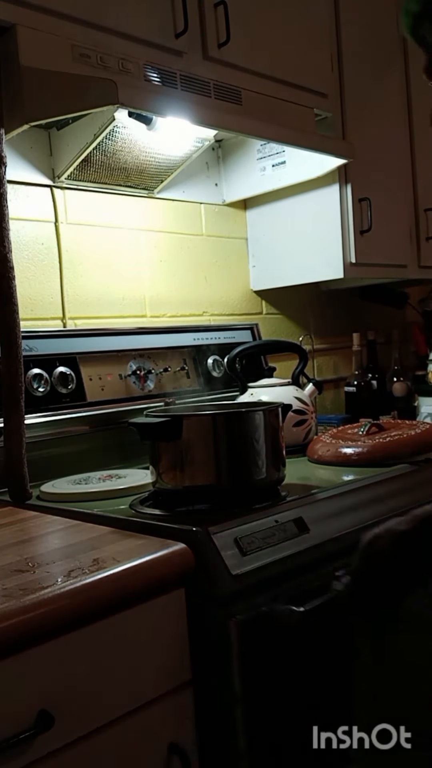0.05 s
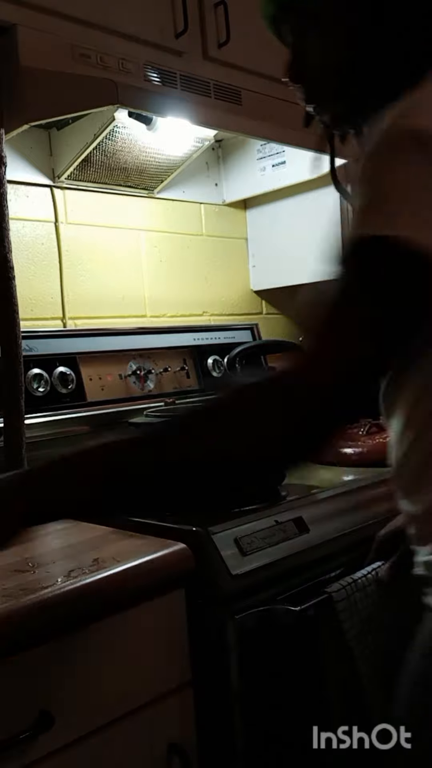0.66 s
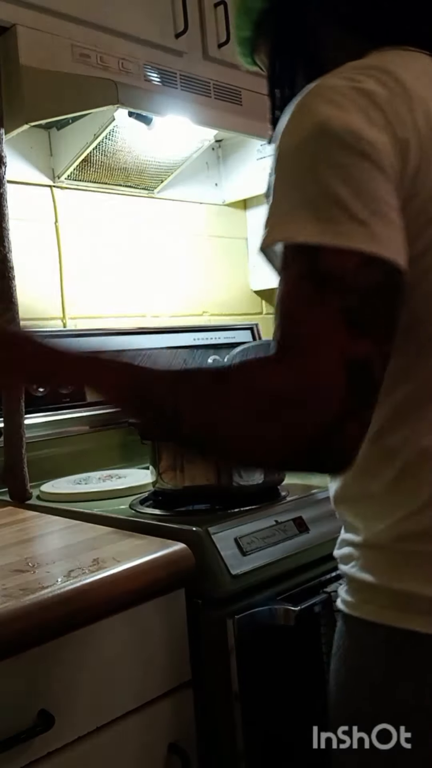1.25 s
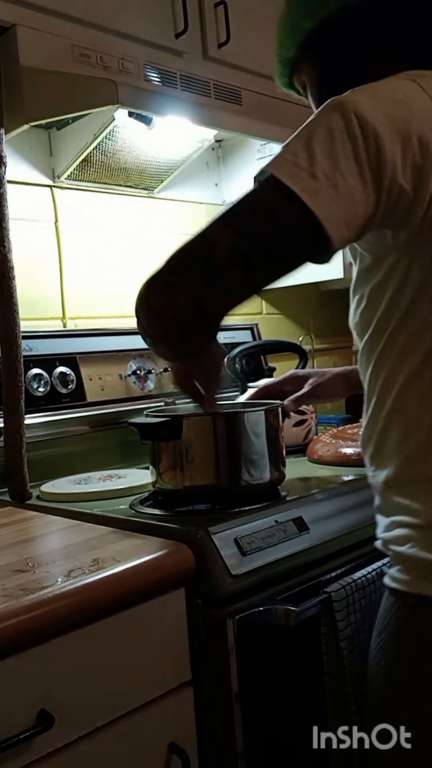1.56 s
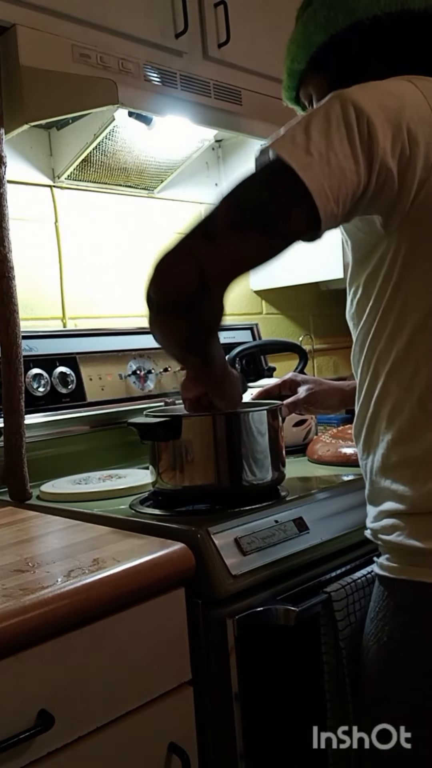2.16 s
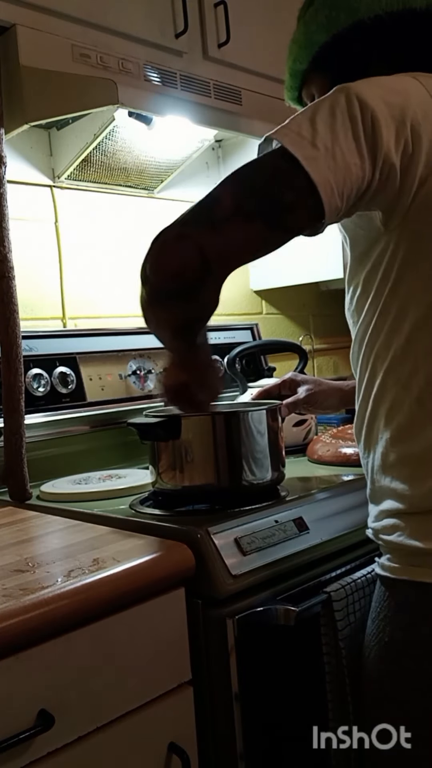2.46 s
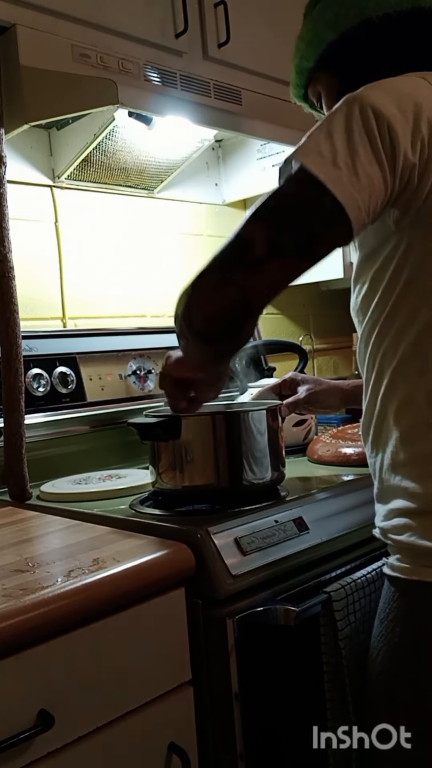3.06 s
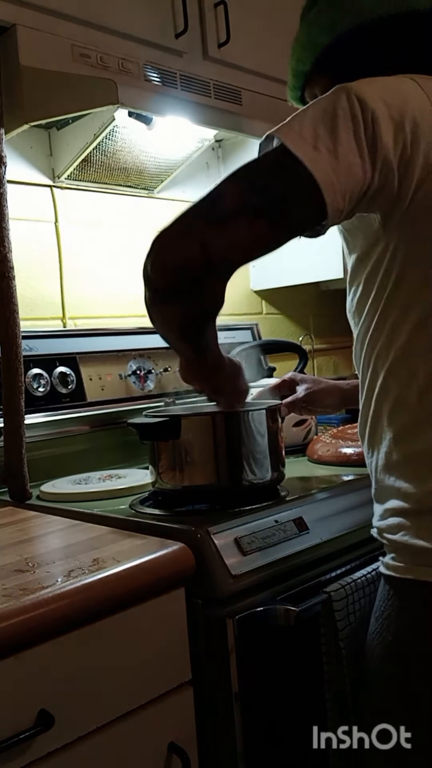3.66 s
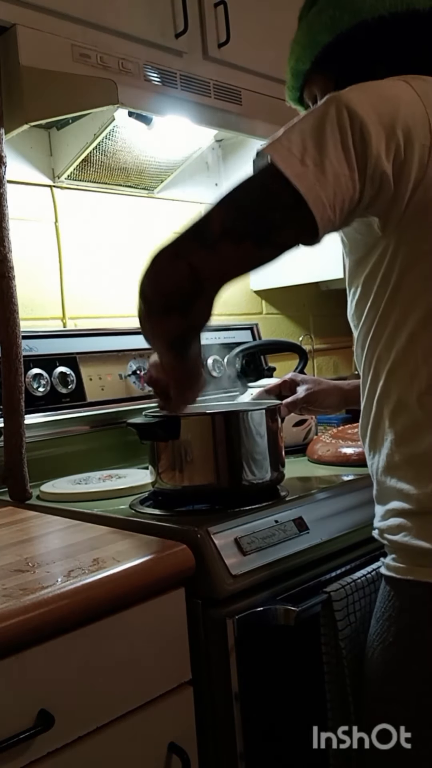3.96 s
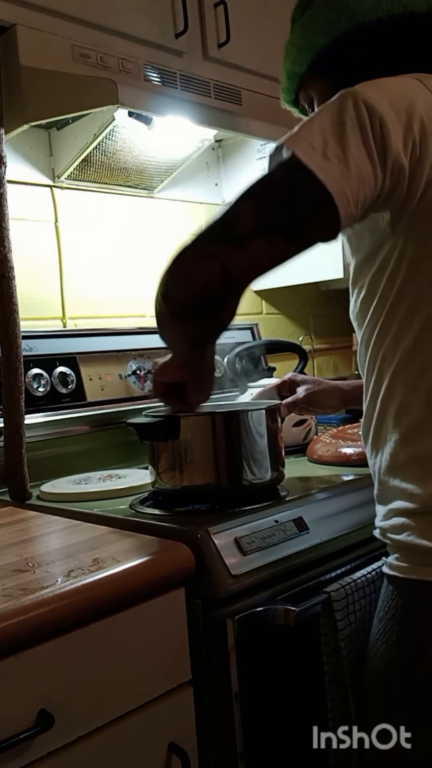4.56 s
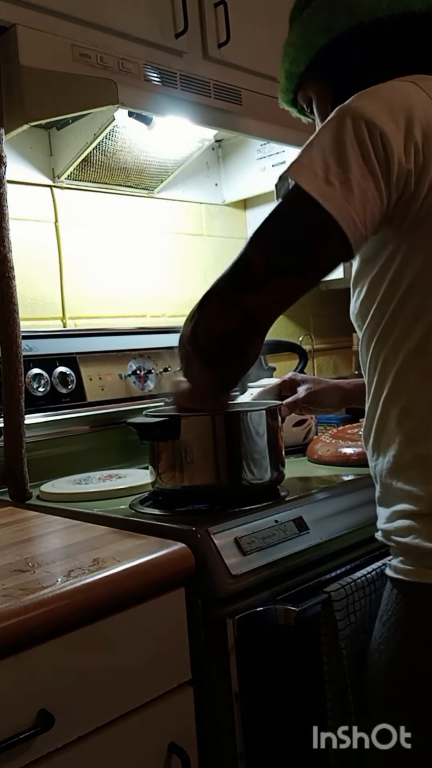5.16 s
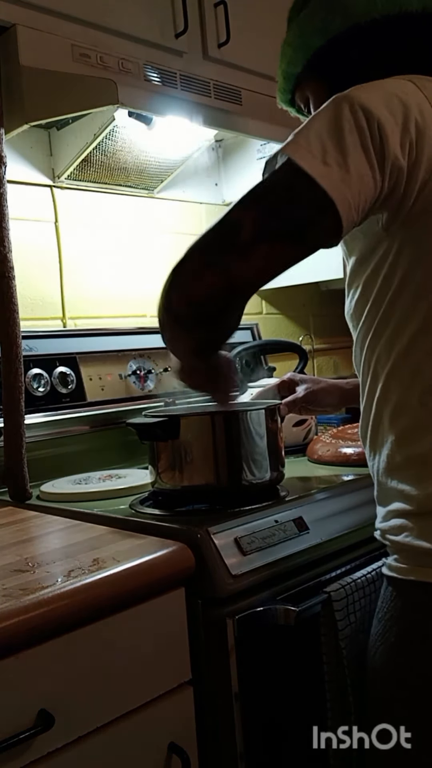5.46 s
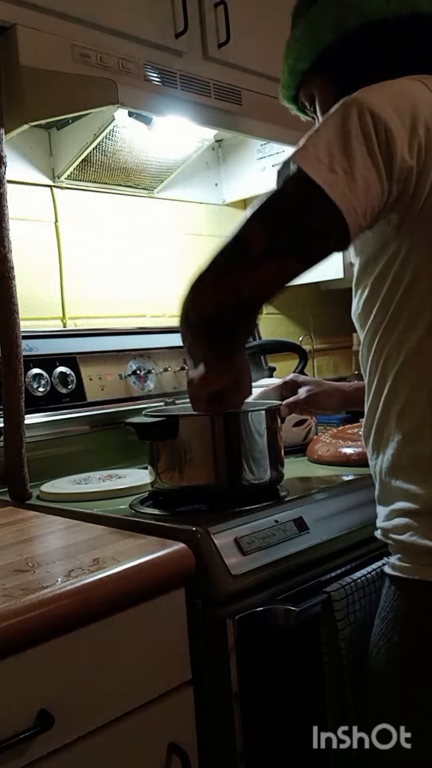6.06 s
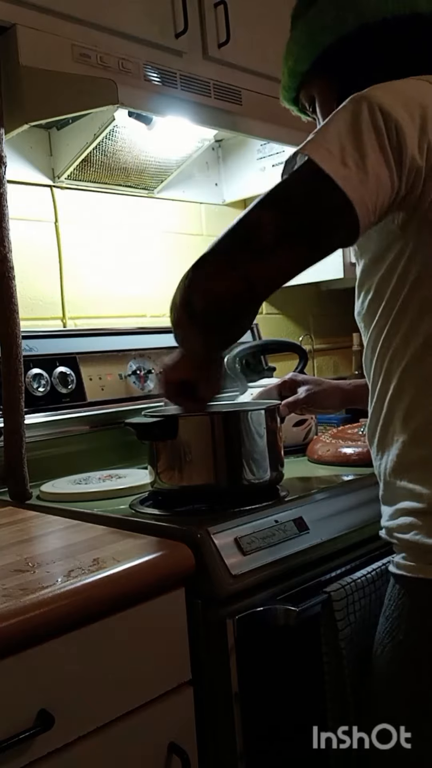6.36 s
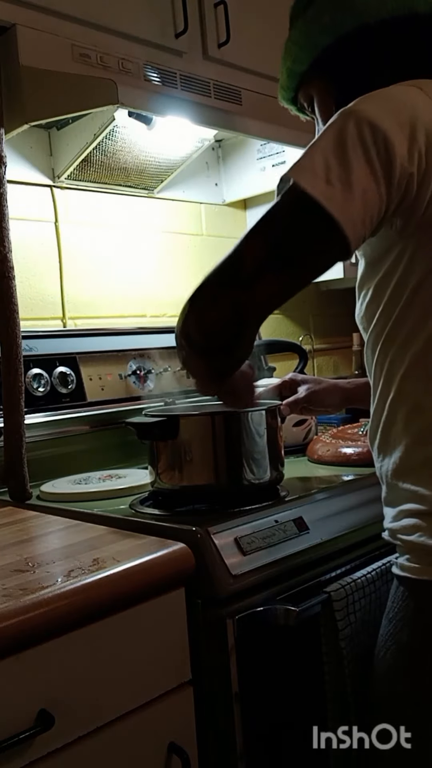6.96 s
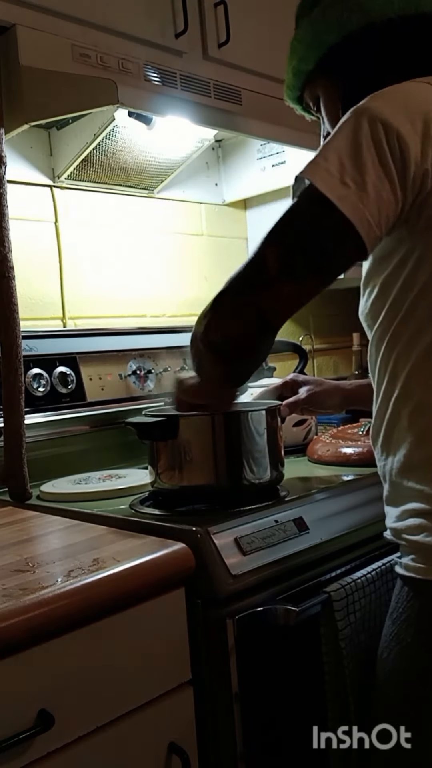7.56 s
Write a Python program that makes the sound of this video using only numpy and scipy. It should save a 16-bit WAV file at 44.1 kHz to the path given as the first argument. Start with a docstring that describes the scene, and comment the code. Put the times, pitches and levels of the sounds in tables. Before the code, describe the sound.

An oven door knocks shut in a small kitchen while a steel pot simmers faintly. A spoon is picked up with a scuff and a clack, clinks into the pot and begins stirring. A bright sizzling hiss swells, with repeated scrapes, small metallic squeaks, soft slops of wet food and dull bumps from the stove. Near the end the spoon clinks again and the hiss eases. A nearby phone microphone picks up a low room rumble.

```python
"""An oven door knocks shut over the faint hiss of a steel pot simmering in a small kitchen. A spoon is
picked up with a scuff and a clack, clinks into the pot and stirs: wet food boils on hot steel, and the
hiss of countless bursting bubbles swells, then slowly eases. Stick-slip friction makes the spoon rasp
and squeak, slopping food excites the air resonances of the pot, and the stove's sheet metal booms dully.
The room reverberates briefly; a phone with two unlike microphones listens."""
import sys
import numpy as np
from scipy import signal
from scipy.fft import rfft, irfft, next_fast_len
from scipy.io import wavfile
from scipy.ndimage import uniform_filter1d

SR = 44100
rng = np.random.default_rng(int(sys.argv[2]) if len(sys.argv) > 2 else 0)


def dump_mix(stems):
    """Bounce the given channels to the path in sys.argv[1] as a 16-bit WAV at rate SR."""
    frames = np.atleast_2d(stems).T  # one column per channel
    limited = np.clip(frames, -1, 1)  # hard clip at full scale
    pcm = np.round(limited * 32767).astype(np.int16)
    wavfile.write(sys.argv[1], SR, pcm)


N = 344421
TIME = np.arange(N) / SR

# Levels in the tables are relative; each source sets its overall gain.
# spectrum of the kitchen's rumble: (f/Hz, level/dB)
RUMBLE_SPECTRUM = [(20, -44), (45, -19), (75, -6.5), (110, -3.5), (160, -1), (270, -8.5), (380, -0.5),
                   (550, -12), (900, -15), (3000, -12.5)]
# dull blows through the stove: (t/s, level/dB, centre f/Hz, T60/s)
STOVE_BUMPS = [(.003, -34, 75, 0.45), (.01, -34.5, 146.5, 0.26), (0.719, -34.5, 84, 0.32),
               (0.729, -36, 160, 0.22), (.895, -49.5, 105, 0.73), (2.083, -44, 143, 0.19),
               (4.524, -44, 146.4, 0.43), (4.585, -42.5, 145, 0.27), (5.062, -46.5, 149, 0.31),
               (5.499, -35, 146, 0.23), (5.515, -40, 370, 0.32), (6.051, -44, 153, 0.27),
               (6.42, -41.5, 149, 0.18), (6.902, -40, 145, 0.27), (6.904, -47, 383, 0.18),
               (7.082, -37.5, 145.5, 0.24)]
# door, then spoon on counter, a row per band: (t/s, level/dB, rise/s, T60/s, low f/Hz, high f/Hz)
KNOCK_BANDS = [(0, -21, 0.0007, 0.08, 450, 1000), (0, -30.5, 0.0017, 0.078, 4500, 6000),
               (0, -22, 0.0007, 0.084, 1500, 2840), (0.691, -30, 0.008, 0.12, 1490, 3620),
               (.709, -20, 0.0027, 0.29, 1000, 3700), (.707, -23.5, 0.007, 0.12, 4200, 13700),
               (.857, -28, .004, 0.13, 1210, 2880), (.876, -17, 0.002, 0.17, 1010, 3100),
               (.877, -18, 0.0007, 0.03, 860, 1270), (.876, -37, .002, .14, 3500, 6000)]
# modes of the air in the pot: (f/Hz, bandwidth/Hz, level/dB)
CAVITY_MODES = [(540, 97, 2), (960, 82, -17), (1210, 158, -5.5)]
# gulps of food, plus a hollow ring after the first clink (1.6 s) and a light knock in the pot (4.798 s):
# (t/s, duration/s, level/dB, lowest mode f/Hz)
CAVITY_SOUNDS = [(1.6, 0.16, -45, 880), (1.795, 0.063, -32.5, 522), (1.868, 0.09, -42.5, 560),
                 (2.021, 0.12, -36.5, 540), (2.11, 0.085, -41, 540), (2.298, 0.086, -40, 511),
                 (2.728, 0.058, -36.5, 550), (2.86, 0.079, -41, 550), (3.136, 0.092, -45, 540),
                 (4.425, 0.053, -39.5, 556), (4.56, 0.05, -48, 540), (4.813, 0.1, -39.5, 580),
                 (4.798, 0.092, -46, 1000), (5.16, 0.049, -42.5, 563), (5.48, 0.057, -39, 537),
                 (5.612, 0.074, -38.5, 540), (6.195, 0.067, -48, 580), (6.873, 0.045, -37.5, 520),
                 (7.657, 0.067, -47.5, 550)]
# modes of the spoon and of the pot wall: (f/Hz, level/dB, T60/s)
SPOON_MODES = [(491, -15.5, 0.18), (550, -17.5, 0.31), (880, -12, 0.084), (4900, -27, 0.039),
               (5190, 4, 0.025), (5140, -6, 0.033), (5240, 6, 0.027), (5850, -17, 0.059), (6190, -7, 0.077),
               (9950, -8, 0.063), (10240, -12, 0.055)]
WALL_MODES = [(1222, -14, 0.44), (1865, -14, 0.16), (3180, -36, 0.17), (3610, -2.5, 0.12), (4360, -5, 0.12),
              (6040, -5, 0.07), (6130, -3, 0.046), (6090, 7, 0.064), (6530, 5, 0.16), (7290, 4, 0.073),
              (8040, 10, 0.073)]
# spoon striking the pot: (t/s, spoon level/dB, wall level/dB)
SPOON_BLOWS = [(1.537, -17.5, -77), (1.544, -48, -63), (1.577, -22.5, -62), (6.795, -60, -23),
               (6.815, -53, -26.5), (7.188, -56, -42)]
# drags that catch one note of the steel: (t/s, duration/s, f/Hz, level/dB)
SQUEAK_NOTES = [(.7, 0.096, 6430, -32), (0.692, 0.085, 5480, -39), (0.703, 0.098, 9920, -33),
                (2.35, 0.12, 1827, -40), (2.39, 0.071, 1190, -42), (2.665, 0.057, 1233, -39),
                (3.828, 0.07, 4220, -32), (4.365, 0.081, 3110, -31.5), (4.69, 0.17, 1878, -40),
                (4.699, 0.051, 4650, -25), (4.728, 0.072, 3593, -33), (5.168, 0.062, 2312, -35.5),
                (5.695, 0.048, 3640, -32.5), (5.727, 0.12, 5056, -27.5), (6.168, 0.18, 1914, -34),
                (6.438, 0.16, 1884, -41.5), (7.08, 0.21, 6030, -31), (7.117, 0.073, 5000, -30),
                (7.127, 0.12, 6580, -30), (7.13, 0.055, 1198, -45), (7.181, 0.072, 3644, -31),
                (7.57, 0.09, 5650, -39)]
# spoon strokes: (t/s, duration/s, drag level/dB, wetted steel's hiss level/dB, bare steel contact 0-1)
SPOON_STROKES = [(1.608, 0.15, -33.5, -44, 0.54), (1.81, 0.28, -31, -34, 0.5),
                 (2.084, 0.37, -31.5, -47, 0.84), (2.487, 0.29, -38, -39, 1), (2.848, 0.4, -38.5, -34, .85),
                 (3.283, 0.41, -53, -47, 0.3), (3.79, 0.19, -43, -31, 0.95), (4.315, 0.37, -40.5, -27, 1),
                 (4.7, 0.063, -31, -34, 0.9), (4.81, 0.15, -38, -30.5, 0.84), (4.987, 0.29, -36, -31, 0.95),
                 (5.29, 0.29, -36, -38.5, 0.6), (5.603, 0.18, -36, -31, .58), (5.8, .16, -42.5, -47, 0.2),
                 (6.128, .24, -36.5, -32.5, 1), (6.484, 0.21, -40, -39, 1), (7.05, 0.16, -38, -27, 0.83),
                 (7.563, 0.12, -45.5, -38.5, 0.5)]
# spectrum of the spoon's rasp: (f/Hz, level/dB)
RASP_SPECTRUM = [(600, -36), (950, -24), (1050, -17), (1140, -11), (1290, -8), (1400, -6.5), (1700, -12.5),
                 (1860, 6.5), (2020, -5.5), (2400, -1.5), (3300, 0), (4300, 3.5), (7000, -10)]
# boiling that simmers, surges as the food is turned, then eases: (t/s, hiss level/dB, spray level/dB)
BOILING_LEVELS = [(0.3, -45, -55), (1.5, -47, -59.5), (1.71, -38, -57), (1.79, -27, -47),
                  (1.92, -27.5, -37), (2.17, -26, -40), (2.3, -28.5, -43), (2.45, -28.5, -39.5),
                  (3.6, -28.5, -39.5), (4.2, -32.5, -40.5), (5.55, -30, -46), (5.88, -30.5, -41.5),
                  (6.7, -32.5, -48.5), (7.0, -35, -55), (7.42, -43.5, -55), (7.8, -40, -59)]
# spectra of bubbles, of the finest droplets and of food meeting dry steel: (f/Hz, level/dB)
HISS_SPECTRUM = [(300, -29), (800, -39), (1500, -12.5), (2100, -11), (3500, -12), (4700, 5), (7000, 3.5),
                 (8500, -1.5), (11000, -8), (16000, -21)]
SPRAY_SPECTRUM = [(5000, -18.5), (7500, 10), (9000, -1), (11000, 4), (16000, 0)]
FLASH_SPECTRUM = [(7000, -35), (9000, 9), (12000, -10), (14500, 14), (16000, 4)]
# responses of the two microphone ports: (f/Hz, level/dB)
LEFT_RESPONSE = [(100, -1.5), (3500, 3.5), (4400, 0.5), (5200, 5), (5900, 9), (6500, 7), (7000, 2),
                 (7500, -7), (8000, -21), (9000, -31), (10000, -43), (13000, -36), (15700, -16)]
RIGHT_RESPONSE = [(100, -9), (1200, -7.5), (2000, -11), (4000, -10.5), (5700, -15.5), (7000, -18),
                  (8300, -20), (9200, -9.5), (10300, -2.5), (11100, -1.5), (12200, -6.5), (13400, -12),
                  (15500, -5.5)]

STROKE_ATTACK_S, STROKE_RELEASE_S, STROKE_SAG_DB_PER_S = 0.054, 0.16, 6.5
STIR_FROM_S, STIR_UNTIL_S, GRAZE_DB, GRAZE_BARE = 1.64, 7.3, -44, 0.8  # light contact between strokes
ROOM_T60_S, ECHO_TO_DIRECT_DB = 0.27, 3
LEFT_LAG_SAMPLES, CUTOFF_HZ = 42, 15950


def undb(db):
    """Amplitude ratio of a level in decibels."""
    return 10 ** (np.asarray(db) / 20)


def unit(x):
    """Normalisation to an rms of 1."""
    return x / np.sqrt(np.mean(x ** 2))


def shape(x, gain):
    """Linear filtering: the spectrum is multiplied by a function of frequency."""
    size = next_fast_len(len(x) + 8192)
    hz = np.maximum(np.arange(size // 2 + 1) * SR / size, 1)
    return irfft(rfft(x, size) * gain(hz), size)[:len(x)]


def colour(x, spectrum):
    """Spectral shaping by (f/Hz, level/dB) points, joined on a logarithmic frequency axis."""
    hz, db = np.transpose(spectrum)
    return shape(x, lambda f: undb(np.interp(np.log(f), np.log(hz), db)))


def resonate(x, hz, width_hz):
    """Resonance: two equal resonators in cascade, each of the given bandwidth."""
    b, a = signal.iirpeak(hz, hz / width_hz, fs=SR)
    return signal.lfilter(b, a, signal.lfilter(b, a, x))


def wander(rate_hz):
    """Slow random modulation: held random levels, smoothed twice."""
    hold = int(SR / rate_hz)
    steps = np.repeat(rng.standard_normal(N // hold + 1), hold)
    return 0.81 * uniform_filter1d(uniform_filter1d(steps, hold), hold)[:N]


def pops(per_s, spread_db):
    """Shot noise: impulses at random moments, most small and a few large."""
    happens = rng.random(N) < per_s / SR
    return happens * rng.choice([-1, 1], N) * undb(spread_db * np.minimum(rng.exponential(size=N), 6))


def fade(t, t60):
    """Exponential damping, by 60 dB in t60 seconds."""
    return np.exp(-np.log(1000) * t / t60)


def add(track, s, sound):
    """Superposition of a sound on the track at s seconds."""
    start = max(int(s * SR), 0)
    track[start:start + len(sound)] += sound[:N - start]


def swell(hz, width_hz, length):
    """Narrow-band noise: a randomly driven resonance that swells and fades."""
    settle = 512  # samples for the resonance to build up
    note = resonate(rng.standard_normal(int(length * SR) + settle), hz, width_hz)[settle:]
    return unit(note) * np.hanning(len(note))


def room(x):
    """Reverberation from tiles and cupboards; long waves reach both ports coherently."""
    t = TIME[:SR // 2]
    shared, *separate = rng.standard_normal((3, len(t)))
    coherence = lambda hz: 1 / (1 + (hz / 750) ** 2)
    common = shape(shared, lambda hz: np.sqrt(coherence(hz)))
    channels = []
    for noise in separate:
        own = shape(noise, lambda hz: np.sqrt(1 - coherence(hz)))
        echoes = (common + own) * fade(t, ROOM_T60_S) * (t > 0.002)
        response = (t == 0) + undb(ECHO_TO_DIRECT_DB) * echoes / np.linalg.norm(echoes)
        channels.append(signal.fftconvolve(x, response / np.linalg.norm(response))[:N])
    return np.array(channels)


def background():
    """Ambient noise: the kitchen's broadband rumble and a faint narrow-band motor hum."""
    rumble = unit(colour(rng.standard_normal(N), RUMBLE_SPECTRUM)) * undb(0.44 * wander(8.3))
    hum = unit(resonate(rng.standard_normal(N), hz=194.6, width_hz=12))
    return undb(-43.5) * rumble + undb(-60) * hum


def bumps():
    """Plate vibration: soft blows excite a cluster of low modes in the stove's sheet metal."""
    out, t = np.zeros(N), TIME[:SR // 2]
    for s, db, hz, t60 in STOVE_BUMPS:
        modes_hz = hz * (np.array([0.8, 1, 1.2]) + 0.052 * rng.standard_normal(3))
        cycles = np.outer(modes_hz, t) + rng.random((3, 1))
        boom = np.array([0.7, 1.3, 0.7]) @ np.sin(2 * np.pi * cycles)
        add(out, s, undb(db) * boom * np.minimum(t / 0.0015, 1) * fade(t, t60))
    return out


def knocks():
    """Modal overlap: the crowded, damped modes of door and counter merge into bands of noise."""
    out, t = np.zeros(N), TIME[:SR // 2]
    for s, db, rise, t60, low_hz, high_hz in KNOCK_BANDS:
        band = lambda hz: 1 / (1 + (low_hz / hz) ** 6) / (1 + (hz / high_hz) ** 8)
        body = unit(shape(rng.standard_normal(len(t)), band))
        attack = np.minimum(t / rise, 1)  # slower for a sliding contact
        add(out, s, undb(db) * body * attack * fade(np.maximum(t - rise, 0), t60))
    return out


def pot_cavity():
    """Cavity resonance: gulps of food, a hollow ring and a light knock, over a soft squelch."""
    hollow_notes, squelch = np.zeros((2, N))
    for s, length, db, lowest_hz in CAVITY_SOUNDS:
        tuning = lowest_hz / CAVITY_MODES[0][0]
        for hz, width_hz, mode_db in CAVITY_MODES:
            add(hollow_notes, s, undb(db + mode_db) * swell(hz * tuning, width_hz, length))
    for hz, width_hz, db in CAVITY_MODES:
        gain = undb(db + 7 * wander(12))
        squelch += gain * resonate(pops(per_s=1500, spread_db=2.8), hz, 2 * width_hz)
    motion = np.interp(TIME, [1.55, 1.8, 6.6, 7.8], [0.3, 1, 0.96, 0.25])
    return hollow_notes + undb(-52) * motion * unit(squelch)


def clinks():
    """Free vibration: each blow rings the modes of spoon and wall, by how squarely it lands."""
    out, t = np.zeros(N), TIME[:SR // 2]
    attack = np.minimum(t / 0.0012, 1)
    for s, spoon_db, wall_db in SPOON_BLOWS:
        for modes, blow_db in ((SPOON_MODES, spoon_db), (WALL_MODES, wall_db)):
            ring = 0
            for hz, db, t60 in modes:
                detuned_hz = hz * (1 + 0.0031 * rng.standard_normal())
                ring += undb(db) * fade(t, t60) * np.sin(2 * np.pi * detuned_hz * t)
            grit = resonate(rng.standard_normal(len(t)) * fade(t, 0.045), hz=8100, width_hz=1500)
            add(out, s, undb(blow_db) * (ring + undb(4) * grit) * attack)
    return out


def squeaks():
    """Frictional excitation: a drag of the spoon dwells on one resonance of the steel."""
    out = np.zeros(N)
    for s, length, hz, db in SQUEAK_NOTES:
        add(out, s, undb(db) * swell(hz, width_hz=50, length=length))
    return out


def pressure(s, length):
    """Contact force of the spoon: it comes on quickly, holds and lets go."""
    release = s + max(length, STROKE_ATTACK_S)
    return np.interp(TIME, [s, s + STROKE_ATTACK_S, release, release + STROKE_RELEASE_S], [0, 1, 1, 0])


def strokes():
    """Incoherent sounds add in power: envelopes of the drag, its part on bare steel and fresh hiss."""
    drag_power = (undb(GRAZE_DB) * pressure(STIR_FROM_S, STIR_UNTIL_S - STIR_FROM_S)) ** 2
    steel_power = GRAZE_BARE ** 2 * drag_power
    flare_power = np.zeros(N)
    for s, length, drag_db, hiss_db, bare in SPOON_STROKES:
        push = pressure(s, length) * undb(-STROKE_SAG_DB_PER_S * np.maximum(TIME - s, 0))
        drag_power += (undb(drag_db) * push) ** 2
        steel_power += (bare * undb(drag_db) * push) ** 2
        flare_power += (undb(hiss_db) * push) ** 2
    return np.sqrt([drag_power, steel_power, flare_power])


def chatter(per_s, low_hz, high_hz, mean_length_s, spread_db):
    """Intermittent contact: each catch of the spoon's edge sounds a brief rough note of random pitch."""
    out = np.zeros(N)
    for when, pitch, size, hold in rng.random((int(per_s * N / SR), 4)):
        hz = low_hz + (high_hz - low_hz) * pitch
        note = swell(hz, width_hz=114, length=mean_length_s * (0.5 + hold))
        add(out, when * N / SR, undb(spread_db * size) * note)
    return unit(out)


def stirring(drag, on_steel):
    """Stick-slip friction of the spoon: a gritty rasp, fleeting notes and the ring of the wall."""
    grip = undb(0.95 * wander(14))
    rasp = diffuse_pops(per_s=7000, spread_db=2.5, spectrum=RASP_SPECTRUM) * undb(0.28 * wander(40))
    notes = chatter(per_s=230, low_hz=2000, high_hz=6200, mean_length_s=0.055, spread_db=8)
    slips = pops(per_s=5000, spread_db=3.5)
    wall = np.zeros(N)
    for hz, db, _ in WALL_MODES:
        coupling = undb(db + 8.7 * np.tanh(wander(16)))  # varies as the point of contact moves
        food_damping = 1 / (1 + (hz / 3000) ** 4)
        wall += coupling * food_damping * resonate(slips, hz, width_hz=91)
    scrape = undb(2) * rasp + room(undb(-7.5) * unit(wall))
    return grip * (drag * scrape + on_steel * room(undb(4) * notes))


def diffuse_pops(per_s, spread_db, spectrum):
    """Diffuse field: the room scatters pops from all over the pot, so each port hears its own."""
    return np.array([unit(colour(pops(per_s, spread_db), spectrum)) for _ in range(2)])


def steam(flare):
    """Boiling: bursting bubbles blur into a hiss, fine droplets into a spray; strokes flare both."""
    times, hiss_db, spray_db = np.transpose(BOILING_LEVELS)
    hiss_gain = np.hypot(undb(np.interp(TIME, times, hiss_db)), flare)
    spray_gain = np.hypot(undb(np.interp(TIME, times, spray_db)), undb(-23.5) * flare)
    flow = undb(1.03 * wander(40) + 0.13 * wander(9))
    hiss = hiss_gain * diffuse_pops(per_s=16000, spread_db=1.5, spectrum=HISS_SPECTRUM)
    spray = spray_gain * diffuse_pops(per_s=25000, spread_db=3.5, spectrum=SPRAY_SPECTRUM)
    flicker_db = 1.4 * wander(16)
    # food first spread over dry steel spits in the highest treble
    first_wetting = np.interp(TIME, [1.72, 1.85, 2.15, 2.27], [0, 1, 1, 0])
    flash = first_wetting * diffuse_pops(per_s=13000, spread_db=1, spectrum=FLASH_SPECTRUM)
    return flow * (undb(1.5) * hiss + undb(12 + flicker_db) * spray) + undb(-27) * flash


def scene():
    """Superposition of steam and stirring, brief sounds echoing in the kitchen, and the low background."""
    drag, on_steel, flare = strokes()
    pot = steam(flare) + stirring(drag, on_steel)
    echoing = room(pot_cavity() + squeaks() + clinks() + knocks())
    return pot + echoing + bumps() + background()


def record(dry):
    """Port resonances colour each channel; the left is slightly delayed and both are low-passed."""
    left = colour(np.pad(dry[0], (LEFT_LAG_SAMPLES, 0))[:N], LEFT_RESPONSE)
    right = colour(dry[1], RIGHT_RESPONSE)
    low_pass = signal.ellip(10, 0.2, 80, CUTOFF_HZ, fs=SR, output="sos")
    return signal.sosfilt(low_pass, [left, right])


dry = scene()
out = record(dry)
dump_mix(out)
```